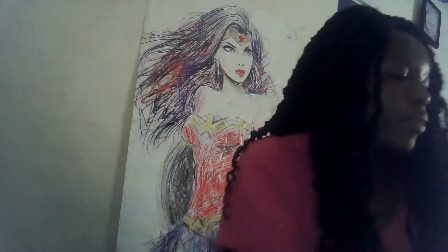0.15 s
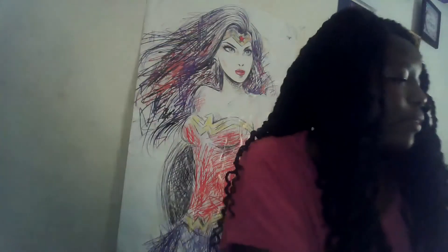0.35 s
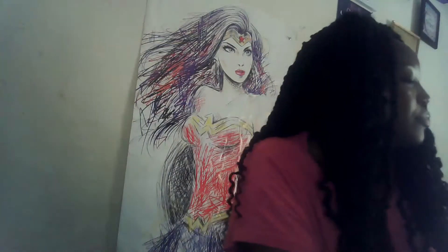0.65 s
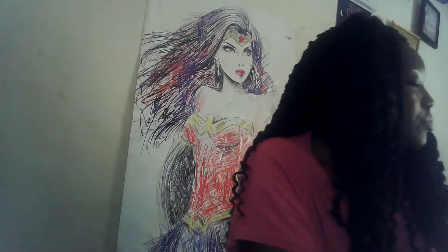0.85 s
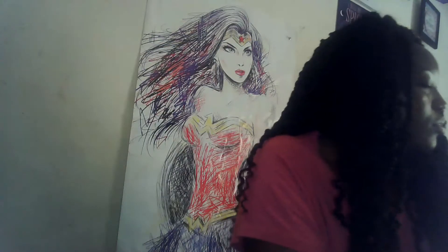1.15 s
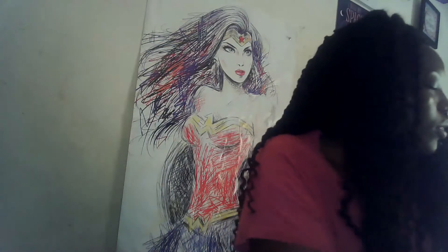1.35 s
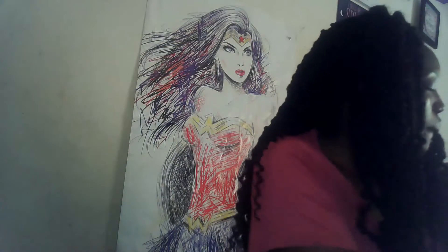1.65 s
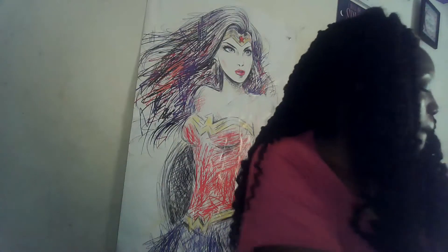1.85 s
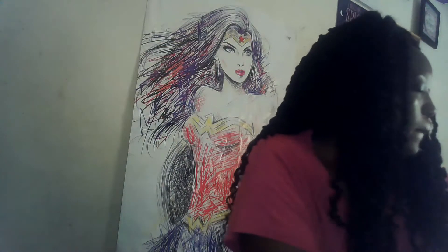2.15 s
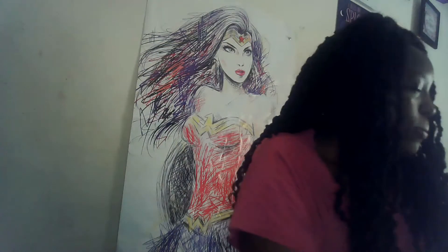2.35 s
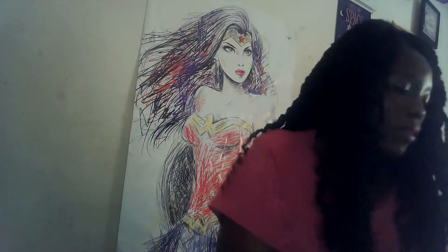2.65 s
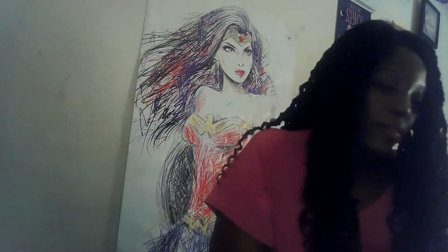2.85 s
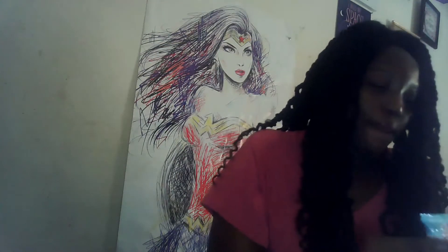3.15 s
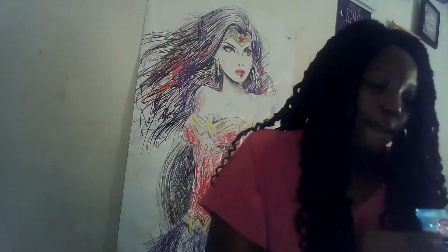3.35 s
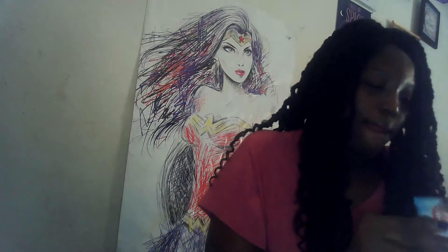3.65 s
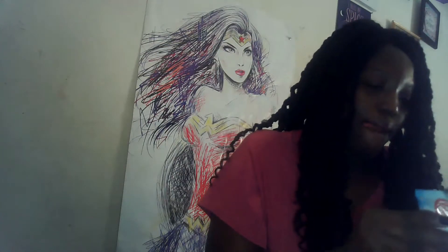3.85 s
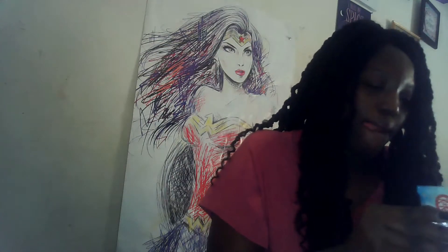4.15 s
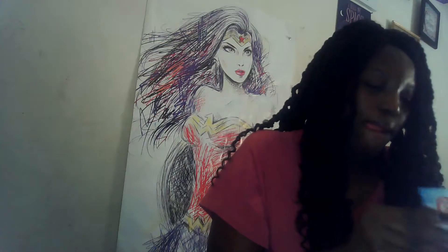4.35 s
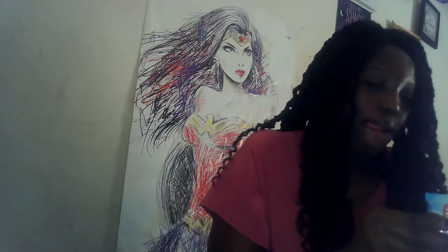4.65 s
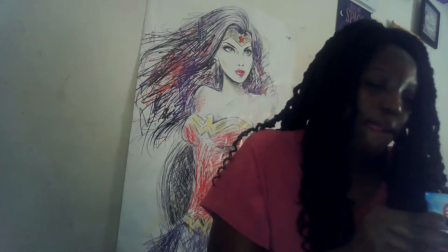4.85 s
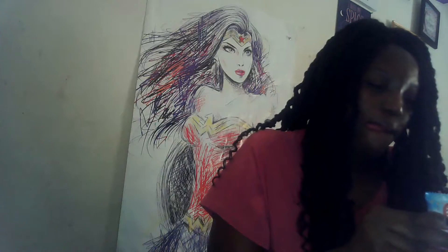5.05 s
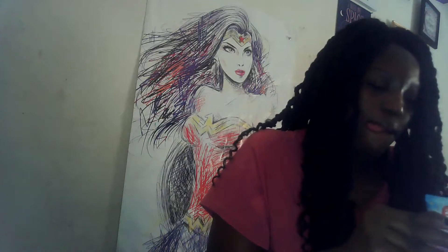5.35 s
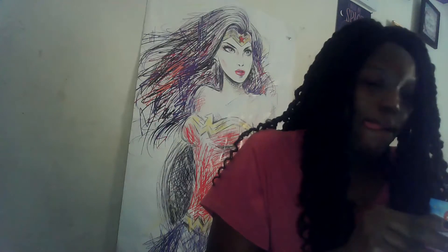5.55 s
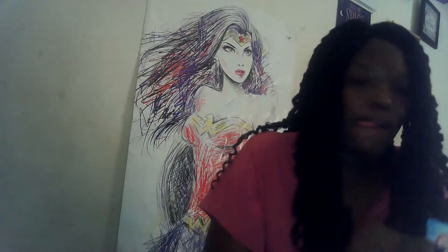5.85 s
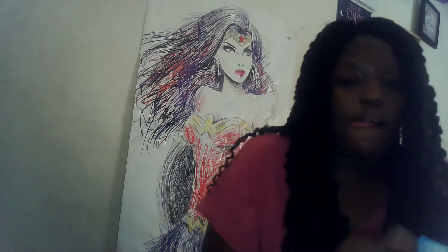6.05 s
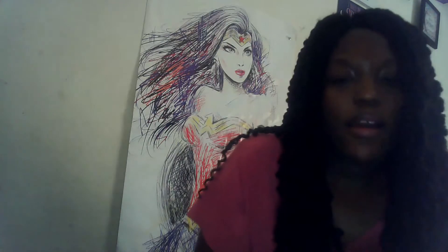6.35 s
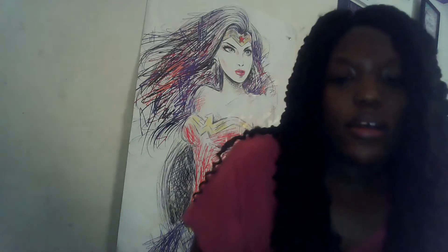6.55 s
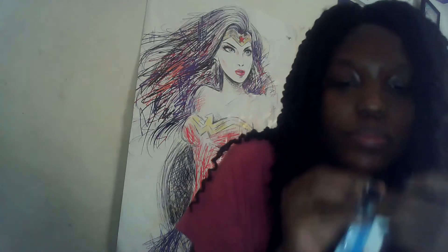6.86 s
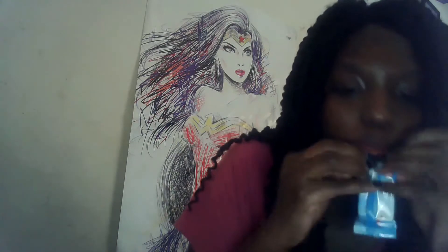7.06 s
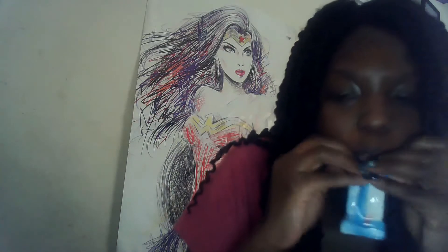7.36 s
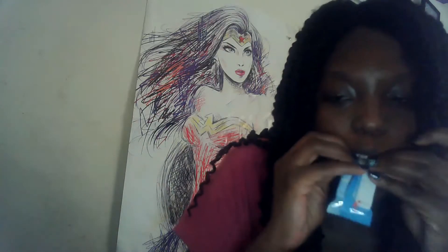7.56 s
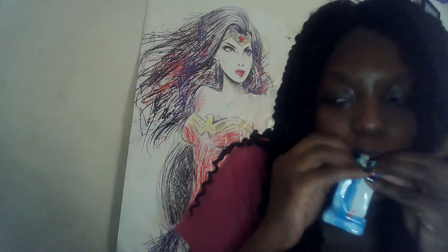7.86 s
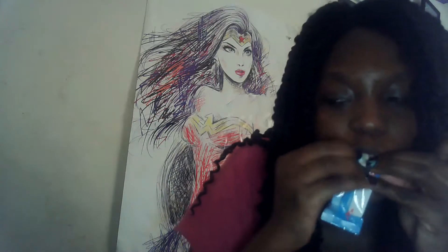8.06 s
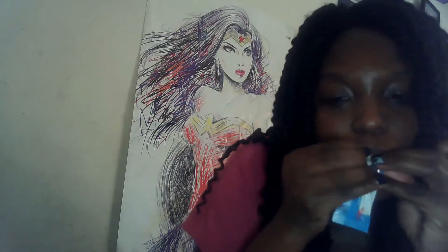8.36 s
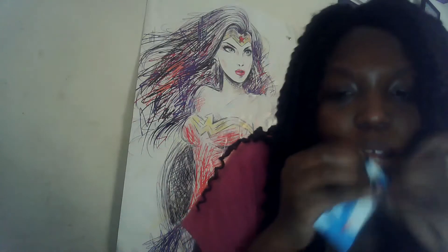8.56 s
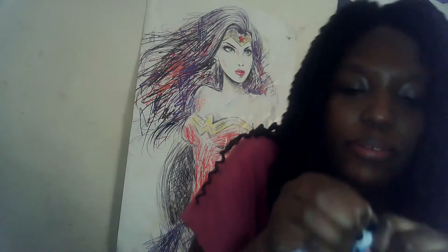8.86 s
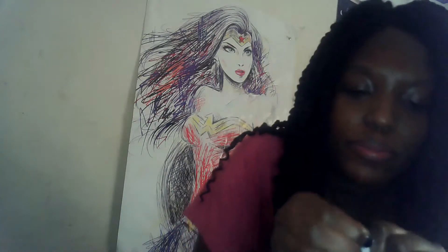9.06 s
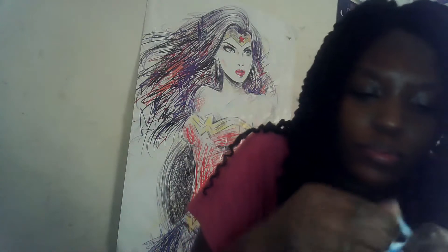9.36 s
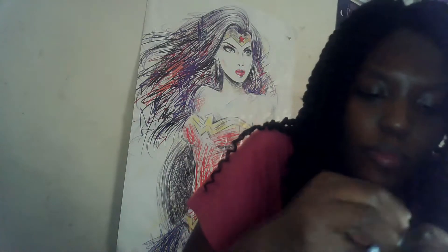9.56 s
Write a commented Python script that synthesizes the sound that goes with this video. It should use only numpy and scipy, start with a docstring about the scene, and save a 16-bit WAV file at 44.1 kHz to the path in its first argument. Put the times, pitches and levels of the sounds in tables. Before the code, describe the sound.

In a small quiet room with low rumble and a faint fan whistle, a plastic bag is rummaged in loud, dense, slightly hollow crackles for about a second and a half, then fades. After a lull, a small stiff wrapper is handled close to a stereo microphone: crisp single snaps, tiny crinkles, a pause, then stronger snaps and short rips as it is torn open.

```python
"""At a desk in a small room with a faint fan, someone rummages in a plastic bag, then handles
a small snack wrapper and tears it open with the teeth. Creases in the film buckle one by one:
single snaps over showers of tiny ones, and short bright rips. Each crease is a click and a flutter,
filtered by its ringing facet. Two close microphones, whose ports ring near 5 kHz, hear it."""
import sys
import numpy as np
from scipy import signal
from scipy.fft import rfft, irfft
from scipy.io import wavfile
from scipy.ndimage import uniform_filter1d

SR = 44100
rng = np.random.default_rng(int(sys.argv[2]) if len(sys.argv) > 2 else 0)


def wrap_up_sound(samples):
    """Save the sound to the file named by the first command line argument, as 16-bit audio."""
    columns = np.atleast_2d(samples).T
    # keep every value between -1 and 1, then stretch to whole-number steps
    tamed = np.clip(columns, -1, 1)
    steps = np.round(tamed * 32767).astype(np.int16)
    wavfile.write(sys.argv[1], SR, steps)


N = 428211
TIME = np.arange(N) / SR


def undb(db):
    """Decibels to gain."""
    return 10 ** (np.asarray(db) / 20)


def unit(x):
    """Scale to rms 1."""
    return x / np.sqrt(np.mean(x ** 2))


def colour(points, hz):
    """Read (Hz, dB) points on a log-frequency axis."""
    point_hz, point_db = np.transpose(points)
    return np.interp(np.log(hz + 1), np.log(point_hz), point_db)


def shaped(x, points):
    """Give a signal the colour of (Hz, dB) points."""
    size = x.shape[-1]
    gain = undb(colour(points, np.fft.rfftfreq(size, 1 / SR)))
    return irfft(rfft(x) * gain, size)


def resonance(x, centre_hz, width_hz):
    """Keep only a narrow band round one pitch."""
    hz = np.fft.rfftfreq(N, 1 / SR)
    return irfft(rfft(x) / (1 + ((hz - centre_hz) / width_hz) ** 2), N)


# Colour of the room's air. Each row: frequency in Hz, level in dB.
ROOM_COLOUR = [(25, 2.5), (70, -6.5), (105, -0.5), (160, -6.5), (220, -7), (300, -13), (1000, -15),
               (13000, -18)]


def background(rumble_hz=150, level_db=-47.5, left_db=1.5, fan_hz=4370):
    """Room rumble shared by both sides, hiss of each microphone, and the faint whistle of a fan."""
    noise = rng.standard_normal((4, N))
    rumble = shaped(noise[2], [(rumble_hz, 0), (900, -5), (3000, -20)])
    hiss = shaped(noise[:2], [(40, -6), (rumble_hz, -3), (2500, 0)])
    air = unit(shaped(rumble + hiss, ROOM_COLOUR))
    air = air * undb([[left_db], [-left_db]])
    whistle = undb(-19) * unit(resonance(noise[3], fan_hz, 130))
    return undb(level_db) * (air + whistle * np.array([[1], [.5]]))


# Part of each sound differs between the microphones, only slightly less in the low range. Each row: frequency
# in Hz, share that differs between the microphones in dB.
STEREO_SPREAD = [(700, -4.5), (2600, -3.5)]


def echoes(x, early_db, late_db, early_s, t60_s, count=24):
    """Quick echoes off desk and body, then the short room tail; a new pattern per stretch as the hands move."""
    t = np.arange(SR // 2) / SR
    out, step = np.zeros((2, N + len(t))), N // count + 1
    for start in range(0, N, step):
        noise = rng.standard_normal((2, 2, len(t)))
        # cubed noise gives a few strong reflections among many weak ones
        early = noise[0] ** 3 * (t > .002) * np.exp(-t / early_s)
        late = noise[1] * (t > early_s) * undb(-60 * t / t60_s)
        both = undb(early_db) * unit(early) + undb(late_db) * unit(late)
        mid, side = both / np.sqrt(2 * len(t))
        response = mid + shaped(side, STEREO_SPREAD) * np.array([[1], [-1]])
        echo = signal.fftconvolve(x[:, start:start + step], response, axes=1)
        out[:, start:start + echo.shape[1]] += echo
    return out[:, :N]


SNAP_SIZE = 1024  # samples


def causal(db):
    """Minimum-phase response of a dB spectrum: sharp attack, ringing after."""
    cepstrum = irfft(np.log(undb(db)))
    cepstrum[..., 1:SNAP_SIZE // 2] *= 2
    cepstrum[..., SNAP_SIZE // 2 + 1:] = 0
    return np.exp(rfft(cepstrum))


# The left microphone is nearer and more open.
# Each row: frequency in Hz, left minus right in dB.
MIC_BALANCE = [(100, 1), (1200, 9), (4200, 10), (5500, 5), (8000, 0.5), (15000, 6.5)]


def snaps(times, size, facet_hz, flex_db, edge_db, pan_db, film, flutter_s, flutter, lag_s, ring_db,
          ring_width_hz=380, aim_s=.00004):
    """Each crease clicks and briefly flutters the film, coloured by its own facet; size is root energy."""
    hz, t = np.fft.rfftfreq(SNAP_SIZE, 1 / SR), np.arange(SNAP_SIZE) / SR
    # each facet rings at its own pitch, has a weaker bending mode at another, and faces its own way
    aim, bend = rng.standard_normal((len(times), 2)).T
    bend_hz = facet_hz * 0.24 * 1.69 ** bend
    ring = 1 / (1 + ((hz - facet_hz[:, None]) / ring_width_hz) ** 2)
    bending = 1 / (1 + ((hz - bend_hz[:, None]) / ring_width_hz) ** 2)

    # strong snaps move large facets and ring clearly; tiny ones are plainer clicks
    depth_db = ring_db * (size[:, None] / size.max()) ** 0.09
    db = colour(film, hz) + depth_db * (ring + bending / 2)
    # flex weights the body, edge the crispness
    db = db + flex_db[:, None] * colour([(2400, 0.88), (3800, 0.12)], hz)
    db = db + edge_db[:, None] * colour([(6000, 0.059), (10000, 0.95)], hz)

    # the flutter swells and stops as the crease runs, a little different towards each microphone
    chance = rng.standard_normal((len(times), 3, SNAP_SIZE))
    stereo_noise = chance[:, :1] + shaped(chance[:, 1:], STEREO_SPREAD)
    push = flutter * stereo_noise * np.exp(-(t / flutter_s - 1) ** 2)
    push[:, :, 0] += 1  # the click

    near = colour(MIC_BALANCE, hz) / 2
    heard = rfft(push) * causal(db - near)[:, None] * np.array([causal(near), causal(-near)])
    # the right side hears it later
    delay_s = np.abs(lag_s + aim_s * aim)[:, None]
    heard[:, 1] *= undb(-pan_db)[:, None] * np.exp(-2j * np.pi * hz * delay_s)
    waves = irfft(heard)
    waves *= (size / np.sqrt((waves ** 2).sum(2).mean(1)))[:, None, None]

    out = np.zeros((2, N + SNAP_SIZE))
    for start, wave in zip(np.clip(times * SR, 0, N - 1).astype(int), waves):
        out[:, start:start + SNAP_SIZE] += wave
    return out[:, :N]


def shower(level, count, spread_db, scatter_db=1.0, drift_db=3.0):
    """Times, sizes, flex and edge of tiny creases: faster and louder as the film is pressed harder."""
    busy = np.cumsum(np.sqrt(level))
    when, size = rng.random((count, 2)).T
    at = np.searchsorted(busy, busy[-1] * (np.arange(count) + when) / count).clip(0, N - 1)
    # many small, few large
    size = undb(-spread_db * np.log(.02 + size))
    # the creases of each moment share the work of the hand
    power = uniform_filter1d(np.bincount(at, size ** 2, N), size=SR // 25)
    size = size * level[at] / np.sqrt(power[at])
    # neighbours in time come from the same fold and sound alike
    own, fold = rng.standard_normal((2, 2, count))
    flex_db, edge_db = scatter_db * own + drift_db * unit(uniform_filter1d(fold, size=25))
    return at / SR, size, flex_db, edge_db


def effort(strokes, attack_s, release_s):
    """Level of the hand's work: strokes swell, hold and die away; overlapping ones add in power."""
    power = np.zeros(N)
    for start, length, db in strokes:
        swell = np.maximum(start - TIME, 0) / attack_s
        decay = np.maximum(TIME - start - length, 0) / release_s
        power += (undb(db) * np.exp(-np.minimum(swell + decay, 20))) ** 2
    return np.sqrt(power)


FACET_SPREAD_HZ = 640


def facets(ring_hz, count):
    """Pitches of chance creases round a centre."""
    return ring_hz + FACET_SPREAD_HZ * rng.standard_normal(count)


# a snap sets in this long after its time, and peaks this far above its mean level over the window
SNAP_RISE_S, CREST_DB, SNAP_WINDOW_S = .0006, 10.5, .004


def strength(peak_db):
    """Root energy of a snap with this nominal peak level."""
    return undb(peak_db - CREST_DB) * np.sqrt(SNAP_WINDOW_S * SR)


# The louder creases of the bag snapping through.
# Each row: time in seconds, nominal peak in dB, flex (body below about 3 kHz) in dB before weighting.
BAG_CRACKS = [(0.051, -4, 0), (0.219, -9.5, -28), (0.311, -10.5, -0.5), (0.361, -5.5, -0.5),
              (0.546, -7, -25), (0.556, -6.5, -22), (0.608, -3.5, 1), (0.646, -3.5, -6), (0.652, -4.5, 4),
              (0.754, -18.5, 23), (0.787, -8.5, -3), (0.873, -16, -12), (0.888, -2, -24),
              (0.953, -7.5, -13), (1.017, -1.5, -22), (1.057, -6, -4), (1.18, -11, -17), (1.283, -26, -5),
              (1.43, -12.5, 6), (1.742, -11, 16), (2.271, -17, -2)]
# The hand squeezes the bag. Each row: start in seconds, length in seconds, level in dB.
BAG_SQUEEZES = [(.215, .04, -28.5), (.32, .05, -28.5), (.415, .045, -27.5), (.545, .025, -23),
                (.608, .025, -17.5), (.69, .03, -24), (.79, .1, -23), (.955, .08, -27), (1.065, .035, -21),
                (1.19, .035, -25), (1.28, .02, -25), (1.43, 0.041, -18.5), (1.54, .015, -24),
                (1.62, .04, -30), (1.75, .05, -20.5), (1.925, .06, -27.5), (2.045, .05, -31.5),
                (2.193, .012, -30.5), (2.308, .012, -32)]
# How hollow the bag sounds as it is gathered up.
# Each row: time in seconds, flex added to every crease in dB before weighting.
BAG_HOLLOW = [(0, -1), (.45, 11.5), (.9, 8), (1.3, 10.5), (1.45, 3.5), (2.4, 9)]
# Colour of the bag's sheet. Each row: frequency in Hz, level in dB.
BAG_COLOUR = [(60, -17.5), (350, -6), (600, -7.5), (1100, -4.5), (3000, 2), (4200, 10), (5450, 10),
              (7500, -3), (11000, -11.5)]
# a squeeze builds up, holds and relaxes
SQUEEZE_ATTACK_S, SQUEEZE_RELEASE_S = .01, .028
# between squeezes the bag keeps stirring, most in the middle of the search, until it is let go
STIR_DB, STIR_PEAK_S, STIR_WIDTH_S, BAG_END_S = -33.5, 0.96, .8, 2.5
BAG_RING_HZ = 4250
# the air in the open bag resonates, most in the middle of the search
CAVITY_HZ, CAVITY_WIDTH_HZ, CAVITY_DB = 1170, 230, -1


def bag(flutter_s=0.0015, flutter=0.16, lag_s=.0001, brighten=0.17, ring_db=8.0):
    """A larger, softer sheet at arm's length: dense roomy crackle; the bigger a crease, the crisper."""
    search = np.exp(-((TIME - STIR_PEAK_S) / STIR_WIDTH_S) ** 2)
    squeeze = effort(BAG_SQUEEZES, SQUEEZE_ATTACK_S, SQUEEZE_RELEASE_S)
    press = np.hypot(squeeze, undb(STIR_DB) * search)
    rustle = shower(press * (TIME < BAG_END_S), count=1300, spread_db=4.1)

    crack_s, peak_db, crack_flex = np.transpose(BAG_CRACKS)
    cracks = crack_s + SNAP_RISE_S, strength(peak_db), crack_flex, np.zeros(len(crack_s))

    s, size, flex_db, edge_db = np.hstack([rustle, cracks])
    flex_db = flex_db + np.interp(s, *np.transpose(BAG_HOLLOW))
    edge_db = edge_db + brighten * 20 * np.log10(size / size.std() / 2)
    sheet = snaps(s, size, facets(BAG_RING_HZ, len(s)), flex_db, edge_db, np.zeros(len(s)),
                  BAG_COLOUR, flutter_s, flutter, lag_s, ring_db)
    cavity = resonance(sheet, CAVITY_HZ, CAVITY_WIDTH_HZ)
    sheet = sheet + undb(CAVITY_DB) * search * cavity
    return sheet + echoes(sheet, early_db=-6, late_db=-9, early_s=0.0046, t60_s=0.42)


# The louder creases of the wrapper snapping through.
# Each row: time in seconds, nominal peak in dB, ring of the facet in Hz, flex (body below about 3 kHz)
# in dB before weighting, edge (crispness above about 8 kHz) in dB before weighting.
WRAPPER_SNAPS = [(2.633, -24, 4400, -4, -17), (2.682, -21.5, 4960, 9, 2), (2.781, -25, 5340.0, 8, -3),
                 (2.816, -20.5, 5460, -20, -1), (2.871, -21, 5330, 0, 5), (2.958, -22, 3950, 7, 0),
                 (3.006, -17, 3980, 1, 1), (3.038, -8.5, 5050, -16, 2), (3.085, -10, 4760, -6, 1),
                 (3.141, -14.5, 5900, 9, 17.0), (3.196, -6, 4970, -3.0, 0), (3.257, -15, 6250, -6, 1),
                 (3.294, -16, 4940, 5, 4), (3.311, -8.5, 4600, -7, 14), (3.425, -7.5, 4700, 1, 0),
                 (3.49, -15.5, 5430, -21, 15), (3.566, -12, 5070, 0, 6), (3.639, -7.5, 5600, -7, 7),
                 (3.817, -21, 5600, -16, 10), (3.843, -12, 5060, -10, 6), (4.052, -20, 5200, 8, 7),
                 (4.109, -11, 4660, 0.5, 7), (4.177, -7, 5170, 5, 1), (4.234, -17.5, 5700, -41, 1),
                 (4.273, -19, 5300, 3, 12.0), (4.309, -9, 5170.0, -12, 7), (4.471, -25, 5340, 3, 3),
                 (4.621, -33, 4500, -4, 6), (4.708, -34, 4900, 6, 11), (4.792, -33, 4500, -7, -6),
                 (5.234, -15, 4400, -3, -3), (5.257, -14.5, 5300, -4, 12), (5.455, -29, 5000, -8, 3),
                 (5.567, -27, 5100, 6, 9), (5.666, -20.5, 4960, 6, 17.5), (5.791, -9.5, 5400, -2, 7),
                 (5.806, -14, 4800, 13, 13.5), (5.935, -19.5, 5070, 2, 3), (5.96, -13.5, 3760, 8.5, 6.5),
                 (6.046, -16.5, 6100, -1, 2), (6.065, -11.5, 6040, -5, 19), (6.097, -11.5, 5070, 2, 21),
                 (6.392, -16.5, 5700, 0, 17), (6.429, -21.5, 4160, 13, -14), (6.491, -14, 4470, 9, 12),
                 (6.54, -11.5, 5530, -1, 0), (6.71, -10.5, 4070, 5, 4), (6.729, -10.5, 4970, -2, -10),
                 (6.776, -17, 5100, 17, 0), (6.847, -18.5, 4300, 9, -2), (6.884, -9, 5100, 4, -8),
                 (6.894, -9, 4670, -11, 12), (6.946, -17.5, 4730, 8, 14), (6.965, -8.5, 4660, -6, 6),
                 (7.019, -20, 4610.0, -10, 2), (7.075, 0, 3980, -8, -5), (7.218, -10, 5380, -11, 8),
                 (7.389, -10, 4740, -4, 4.5), (7.456, -24.5, 4270, 4, -9), (7.591, -9, 5170, -16, -1),
                 (7.647, -13.5, 4250, -5, 9), (7.696, -10, 4300, -6, 8), (7.782, -9.5, 4860, -4, -2),
                 (7.917, -14, 4600, -10, 12), (8.12, -19, 4310.0, -8, -6.0), (8.14, -14, 4600, -3, 9),
                 (8.217, -8.5, 4700, 4, 1), (8.243, -1, 5100, -2.5, -1), (8.287, -11, 5100, 2, 10),
                 (8.353, -5, 4530, 2, 4.5), (8.401, -16.5, 5400, -18, 12), (8.46, -15, 5000, 5, -6),
                 (8.49, -12.5, 3970, 1, 9), (8.515, -13, 5270, 3, 7), (8.542, -9.5, 4500, 2, 10.5),
                 (8.633, -7, 3600, 4, 12.5), (8.659, -18, 2870, 18.5, 3), (8.683, -19.5, 4570, -8, 0),
                 (8.728, -8.5, 4700, -6, -6), (8.834, -14.5, 5660, -14, 15), (8.913, -2.5, 4420, -4, 6.5),
                 (8.987, -8, 4540, 5, 2), (9.117, -9.5, 4580, -0.5, -1.5), (9.191, -20.5, 4770, 3, 0),
                 (9.266, -12, 2720, 4.5, 5), (9.356, -7, 4030, -6.5, 1), (9.39, -16, 5200, 5, 5),
                 (9.464, -24, 4770, 6, -7), (9.528, -16.5, 4170, 11, 0), (9.676, -20, 4480, 7, 4)]
# The fingers twist the wrapper. Each row: start in seconds, length in seconds, level in dB.
WRAPPER_TWISTS = [(2.38, .4, -52), (3.04, .28, -44), (3.42, .12, -39), (3.635, .03, -37.5),
                  (4.07, .27, -43), (5.782, .03, -38), (5.955, .14, -42), (6.49, .07, -40.5),
                  (6.7, .07, -38.5), (6.885, .1, -41), (7.064, .03, -34), (8.14, .06, -46),
                  (8.22, .14, -36), (8.485, .055, -33.5), (8.615, .06, -38.5), (8.9, .035, -31),
                  (9.12, .06, -43.5), (9.26, .028, -33.5), (9.33, .06, -40)]
# The film rips or scrapes over itself. Each row: start in seconds, length in seconds, level in dB.
WRAPPER_RIPS = [(3.409, .03, -30.5), (3.46, .08, -37.5), (3.624, 0.029, -33), (6.029, .04, -36.5),
                (7.228, .075, -43), (8.18, .15, -35.5), (8.891, .042, -24.5)]
# The wrapper lies in the middle, then is lifted towards the left microphone.
# Each row: time in seconds, extra left minus right in dB.
WRAPPER_LIFT = [(6.2, -.5), (6.8, 0.5)]
# Colour of the wrapper's film. Each row: frequency in Hz, level in dB.
WRAPPER_COLOUR = [(800, -25), (1600, -13.5), (2900, -8.5), (4000, 0), (5600, -0.5), (8000, -12),
                  (12000, -17.5), (15500, -15.5)]
# the stiff film answers quickly and settles quickly
TWIST_ATTACK_S, TWIST_RELEASE_S = .005, 0.017
# once picked up, the wrapper ticks faintly just from being held
HELD_DB = -60


def wrapper(flutter_s=0.00082, flutter=0.17, lag_s=.00006, ring_db=13, settle_s=.012, settle_db=-16.5,
            lead_s=.003, count=7):
    """Stiff thin film held near the microphones: single snaps, fine crinkle and short bright rips."""
    def sound(creases, flutter, ring_db):
        """The sound of some creases, from where the wrapper is held."""
        pan_db = np.interp(creases[0], *np.transpose(WRAPPER_LIFT))
        return snaps(*creases, pan_db, WRAPPER_COLOUR, flutter_s, flutter, lag_s, ring_db)

    snap_s, peak_db, ring_hz, flex, edge = np.transpose(WRAPPER_SNAPS)
    loud = snap_s + SNAP_RISE_S, strength(peak_db), ring_hz, flex, edge

    # a snap shifts the load and neighbouring creases give way round it,
    # nearer to its own level when the snap is weak
    s, near_db, facet_hz, flex_db, edge_db = np.repeat(np.transpose(WRAPPER_SNAPS), count, axis=1)
    delay, weaker = rng.exponential(size=(len(s), 2)).T
    near_db = near_db / 2 - 6 * weaker + settle_db
    settle_times = s - lead_s + settle_s * delay
    settling = settle_times, strength(near_db), facets(facet_hz, len(s)), flex_db, edge_db

    # small creases take after the fold that is snapping at the time
    twist = effort(WRAPPER_TWISTS, TWIST_ATTACK_S, TWIST_RELEASE_S)
    grip = np.hypot(twist, undb(HELD_DB) * (TIME > BAG_END_S))
    s, size, flex_db, edge_db = shower(grip, count=650, spread_db=4.0)
    flex_db = flex_db + np.interp(s, snap_s, flex) / 2 + 5.5
    crinkle = s, size, facets(ring_hz.mean(), len(s)), flex_db, edge_db + edge.mean()

    pull = np.zeros(N)
    for start, length, rip_db in WRAPPER_RIPS:
        pull += undb(rip_db) * (TIME > start) * (TIME < start + length)
    s, size, flex_db, edge_db = shower(pull, count=220, spread_db=3.5)
    rips = s, size, facets(ring_hz.mean(), len(s)), flex_db, edge_db + 17.0

    small = sound(np.hstack([settling, crinkle, rips]), flutter, ring_db)
    # the microphones face one ringing facet; the room hears the whole sheet from all sides
    all_sides = small + sound(loud, 0, 0)
    room = echoes(all_sides, early_db=-10, late_db=-9.5, early_s=0.0045, t60_s=0.3)
    return sound(loud, flutter, ring_db) + small + room


def scene():
    """Bag first, then the wrapper, over the quiet room."""
    return background() + bag() + wrapper()


TOP_HZ = 16000


def record(dry):
    """Peaks beyond full scale are clipped flat, then a steep low-pass cuts the top."""
    low_pass = signal.ellip(10, .2, 70, TOP_HZ, fs=SR, output="sos")
    return signal.sosfilt(low_pass, np.clip(dry, -1, 1))


dry = scene()
out = record(dry)
wrap_up_sound(out)
```